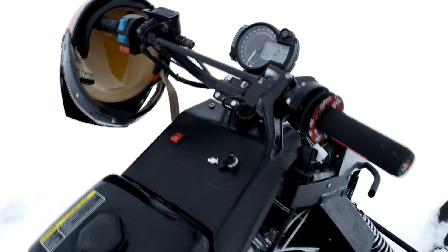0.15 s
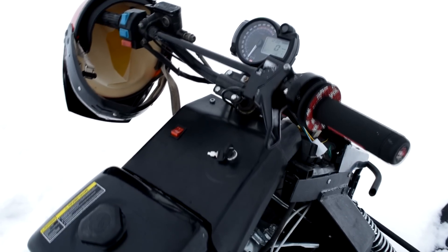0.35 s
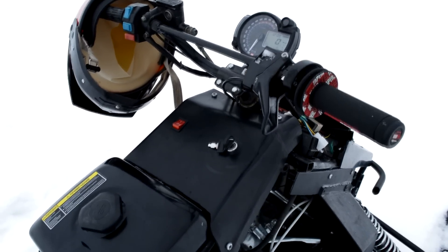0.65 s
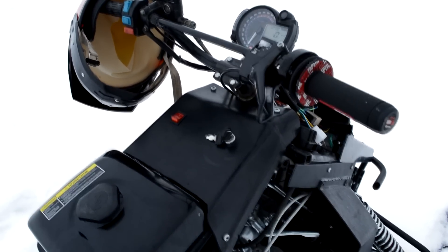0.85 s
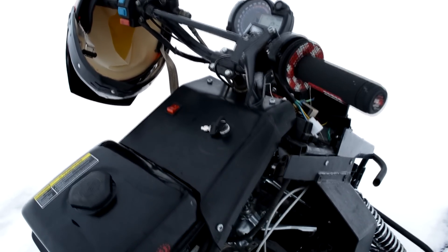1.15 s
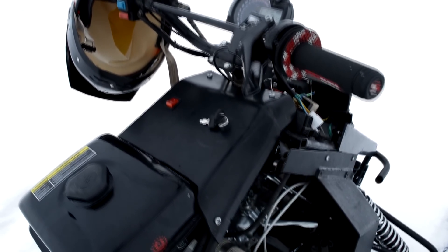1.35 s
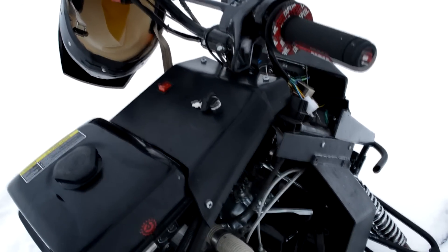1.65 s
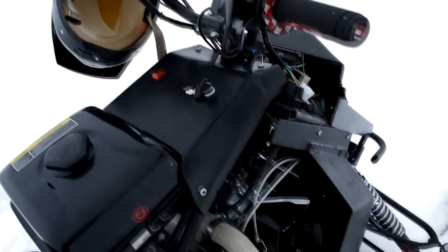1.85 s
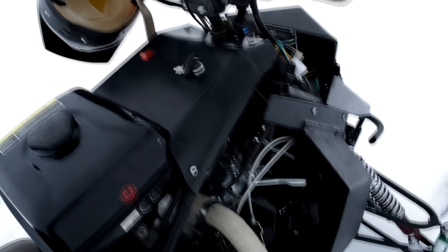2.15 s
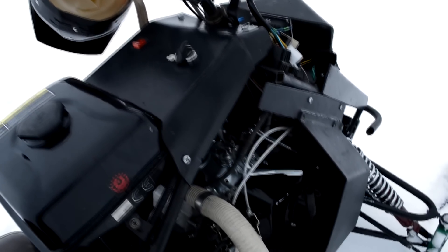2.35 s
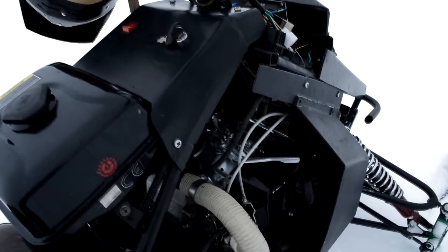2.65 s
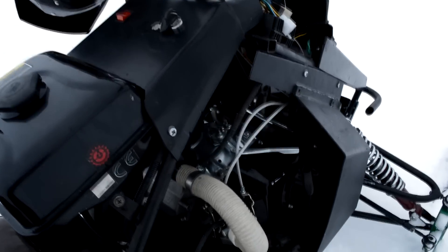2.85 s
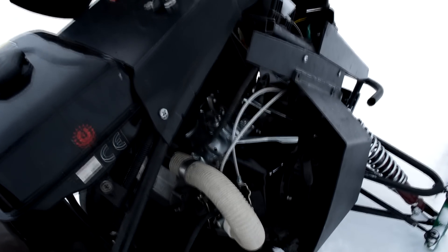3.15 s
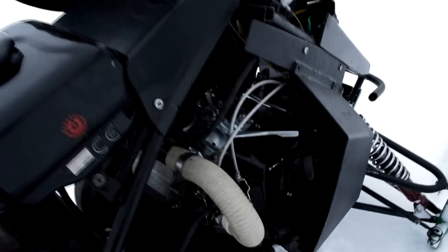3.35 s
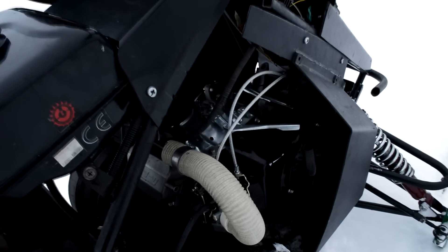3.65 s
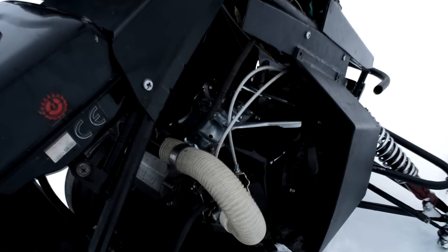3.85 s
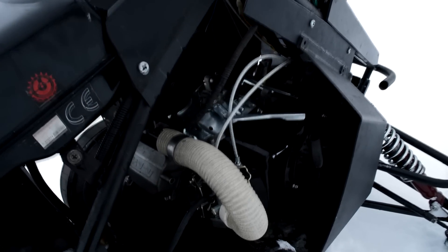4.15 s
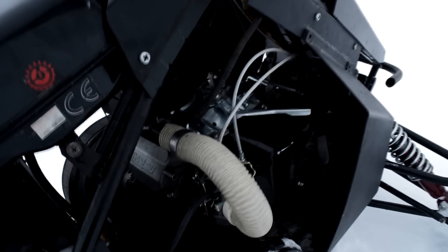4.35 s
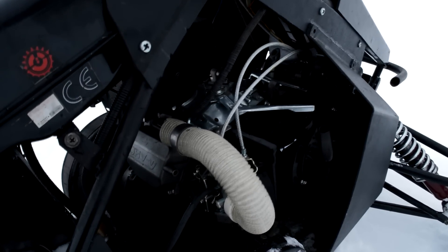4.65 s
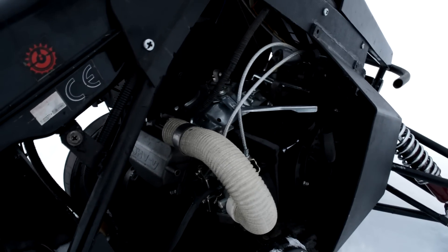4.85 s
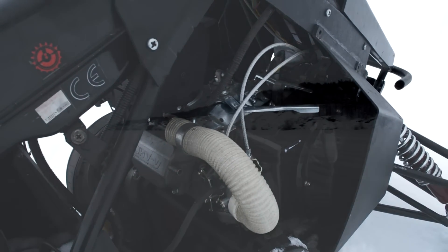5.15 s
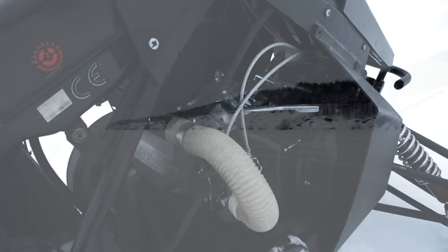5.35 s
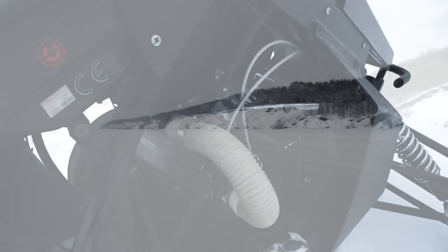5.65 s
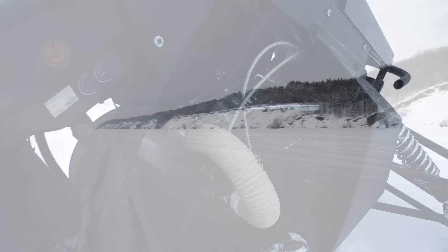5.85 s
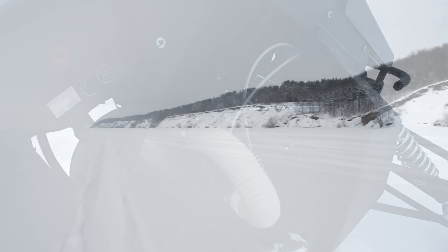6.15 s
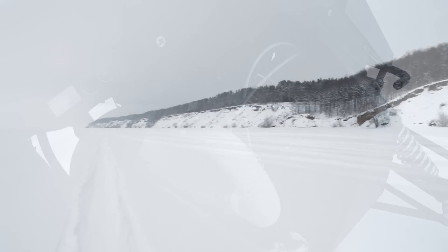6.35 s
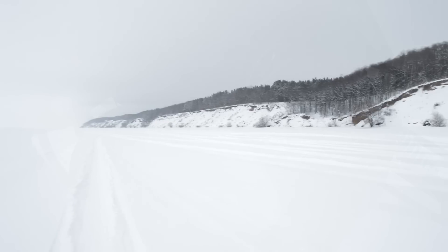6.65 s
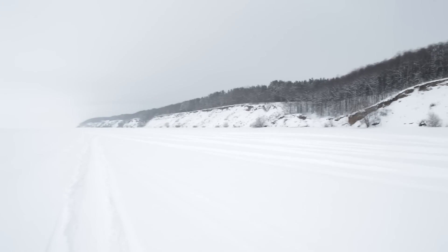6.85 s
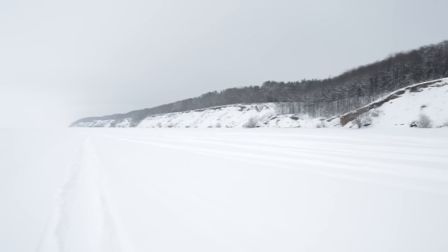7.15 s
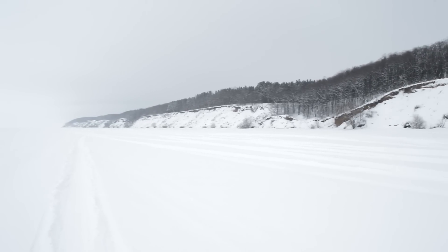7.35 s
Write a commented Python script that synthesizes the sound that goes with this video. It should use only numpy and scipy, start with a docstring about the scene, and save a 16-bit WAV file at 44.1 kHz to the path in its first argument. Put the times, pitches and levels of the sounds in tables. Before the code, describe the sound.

A parked snowmobile's one-cylinder four-stroke engine idles outdoors with a fast, even beat. Bright metallic knocks and rattles ring over a whirr, a light hiss and weak, low exhaust puffs. The tone shifts slightly as the close microphone moves from the tank toward the cylinder. After about five seconds the engine fades out, leaving very faint air, a low microphone flutter and a barely audible high whistle.

```python
"""Outdoors, a one-cylinder four-stroke engine idles in an open frame while the microphone moves closer.
In every cycle, puffs of exhaust gas boom in the silencer, and metal parts knock together in a fixed
order and make the casing ring. Then the engine is faded out, leaving still air on a snow field,
a low flutter on the microphone and a thin electronic whistle."""
import sys
import numpy as np
from scipy import signal
from scipy.fft import rfft, irfft, next_fast_len
from scipy.io import wavfile
from scipy.ndimage import map_coordinates

SR = 44100
rng = np.random.default_rng(int(sys.argv[2]) if len(sys.argv) > 2 else 0)


def file_out(sig):
    """Save sig as 16-bit WAV at sys.argv[1]."""
    # one column per channel
    cols = np.atleast_2d(sig).T
    # limit, then scale
    lim = np.clip(cols, -1, 1)
    pcm = np.round(lim * 32767).astype(np.int16)
    wavfile.write(sys.argv[1], SR, pcm)


N = 330750
T = np.arange(N) / SR


def amp(db):
    return 10 ** (np.asarray(db) / 20)


def unit(x):
    return x / np.sqrt(np.mean(x ** 2) + 1e-20)


def over_time(rows):
    """Join (time, value) points with straight lines."""
    return np.interp(T, *np.transpose(rows))


def over_pitch(hz_points, db, f):
    """Join (frequency, level) points into a gain for each frequency f."""
    return amp(np.interp(np.log(f + 1), np.log(hz_points), db))


def wobble(rate):
    """A smooth curve through `rate` random values a second."""
    return map_coordinates(rng.standard_normal(int(N * rate / SR) + 4), [T * rate])


def filtered(x, response):
    """Scale and delay each frequency of x as response(f) says."""
    size = next_fast_len(N + SR // 2) * 2
    return irfft(rfft(x, size) * response(np.fft.rfftfreq(size, 1 / SR)), size)[..., :N]


def ring_after(gain):
    """A filter with these gains that rings only after a blow, never before."""
    cepstrum = irfft(np.log(gain + 1e-6))
    half = len(cepstrum) // 2
    cepstrum[1:half] *= 2
    cepstrum[half + 1:] = 0
    return np.exp(rfft(cepstrum))


def resonance(f, hz, width):
    """One ringing note: the narrower it is, the longer it rings."""
    return 1j * f * width / (hz * hz - f * f + 1j * f * width)


# The tone of the air noise: f/Hz, level/dB
AIR_TONE = [(20, -33), (40, 1), (65, -3), (150, -10), (500, -19), (1700, -24.5), (8000, -31), (15500, -36)]

def still_air(flutter_db=3.58):
    """Faint air noise whose bass flutters on the microphone."""
    hz, db = np.transpose(AIR_TONE)
    air = unit(filtered(rng.standard_normal(N), lambda f: over_pitch(hz, db, f)))
    bass = filtered(air, lambda f: 1 / (1 + (f / 200) ** 4))
    return air + bass * (amp(flutter_db * wobble(16)) - 1)


def whistle(fade, hz=15687, start_db=-71, end_db=-61):
    """The thin, wavering whistle of the electronics swells late in the fade."""
    tone = np.sqrt(2) * np.sin(2 * np.pi * hz * T + .6 * wobble(25))
    return (amp(start_db) + (amp(end_db) - amp(start_db)) * fade ** 2.5) * tone


# How fast the engine idles: t/s, speed/(cycles per s)
IDLE_SPEED = [(0, 12.064), (.9, 11.737), (1.25, 11.907), (1.9, 11.858), (3, 12.017), (4.4, 12.399),
              (5.1, 12.298), (5.65, 12.291), (5.9, 12.045), (7.5, 11.806)]

def once_per_cycle(position, jitter, scatter_db):
    """One click at this position in every engine cycle, a little off in time and size."""
    cycles = .039 + np.cumsum(over_time(IDLE_SPEED)) / SR  # starts just into a cycle
    count = int(cycles[-1])
    slip, size = rng.standard_normal((count, 2)).T
    when = np.interp(np.arange(count) + position + jitter * slip, cycles, T)
    samples = np.minimum((when * SR).astype(int), N - 1)
    return np.bincount(samples, amp(scatter_db * size), N)


# Puffs of gas: position/cycle, relative pressure (below 0 sucks)
GAS_PUFFS = [(.205, .45), (.263, -.43), (.316, 1), (.414, -.66), (.57, .43), (.72, .25), (.87, .3)]
# The silencer's notes: f/Hz, width/Hz, level/dB, sign (-1 flips the wave)
SILENCER_NOTES = [(51, 21, 0, 1), (135, 24, -2, 1), (99, 8, -8, -1), (205, 24, -6, 1), (280, 22, -8.5, -1),
                  (362, 14, -12, 1)]

def exhaust(swirl_db=-16, cutoff_hz=45):
    """Puffs and swirling gas boom in the silencer; little of the deepest bass gets out."""
    puffs = sum(size * once_per_cycle(at, jitter=.0018, scatter_db=.8) for at, size in GAS_PUFFS)
    gas = unit(puffs) + amp(swirl_db) * rng.standard_normal(N)

    def silencer(f):
        notes = sum(sign * amp(db) * resonance(f, hz, width) for hz, width, db, sign in SILENCER_NOTES)
        ratio = f / cutoff_hz
        bass_cut = -ratio ** 2 / (1 + 1.4j * ratio - ratio ** 2)
        return bass_cut * notes
    return unit(filtered(gas, silencer))


# Round trips of a blow inside the frame: t/ms
ROUND_TRIPS = [.7, 1.1, 1.7, 2.3, 3.7]

def through_frame(f):
    """Echoes smear a blow in time, and low notes travel more slowly through the metal."""
    trips = np.exp(-2j * np.pi * f * np.array(ROUND_TRIPS)[:, None] / 1000)
    echoes = np.prod((trips - .6) / (1 - .6 * trips), axis=0)
    lag = np.exp(-2j * np.pi * .0045 * (2 * np.sqrt(1000 * f) - f / np.sqrt(3)))  # no delay at 3 kHz
    head_start = np.exp(2j * np.pi * f * .0065)  # centres the smear on the knock
    return lag * echoes * head_start


# The four parts are tank, panels, casing and fins, from low to high. Borders between them: f/Hz
PART_BORDERS = [1000, 1700, 3300]
# Metal hitting metal: position/cycle, rattle rise/ms, rattle decay/ms, level/dB for each part
METAL_KNOCKS = [(.215, 1, 3.5, -3, -8, -4, 4), (.265, 1, 3.5, 0, -2, -1, 4), (.5, 1.5, 4, -1, -4, 4.5, 1),
                (.595, .8, 3, 4, 6, 6, 8), (.635, .8, 3.5, 2, 4, 7, 5.5), (.775, 1, 4.5, 6.5, 3, 2, 0),
                (.9, 1.5, 5, 0, -2, 1, -6)]
# How much of a knock's energy is one solid blow: share (0-1) for each part
SOLID_SHARE = np.array([[.95], [.92], [.7], [.2]])
# Steady whirr of chain and bearings: level/dB for each part
WHIRR = [-6, -6.5, -6, -8]

def knocks(flicker_db=1.3):
    """Each knock shakes the parts with a solid blow and a short rattle, over a steady whirr."""
    ms = np.arange(SR // 20) / SR * 1000
    noise_power = amp(WHIRR)[:, None] ** 2 * np.ones(N)
    blows = 0
    for position, rise, decay, *db in METAL_KNOCKS:
        hits = once_per_cycle(position, jitter=.0005, scatter_db=.6)
        gain = amp(db)[:, None]
        shape = np.exp(-ms / decay) * (1 - np.exp(-ms / rise))
        bursts = np.abs(signal.fftconvolve(hits ** 2, shape)[:N])
        noise_power += (1 - SOLID_SHARE) * gain ** 2 * bursts
        blows = blows + np.sqrt(SOLID_SHARE * shape.sum()) * gain * hits
    rattle = np.sqrt(noise_power) * rng.standard_normal(N) * amp(flicker_db * wobble(600))

    def part_ranges(f):
        below_border = [1 / (1 + (f / hz) ** 8) for hz in PART_BORDERS]
        return np.diff(below_border, axis=0, prepend=0, append=1)
    return filtered(rattle + filtered(blows, through_frame), part_ranges).sum(axis=0)


def hiss():
    """A steady high hiss, perhaps cooling air."""
    return filtered(rng.standard_normal(N), lambda f: amp(-.71) * resonance(f, hz=8670, width=3600) ** 2)


# The notes the metal rings with: f/Hz, width/Hz
METAL_NOTES = [(584, 20), (653, 26), (765, 56), (865, 26), (981, 22), (1100, 56), (1216, 24), (1310, 56),
               (1440, 84), (1626, 56), (2040, 126), (2130, 70), (2280, 98), (2390, 98), (2520, 84),
               (2710, 112), (2870, 98), (2960, 126), (3180, 168), (3490, 50), (3890, 126), (5100, 280),
               (5750, 150), (6700, 210), (9600, 490)]
# How strong each note is: level/dB at microphone spots 0, 1, 2
NOTE_LEVELS = [(8.5, 10.5, 9), (-2, 11.5, 14), (6, 13.5, 14), (0.5, 9, 1), (15, 9.5, 10), (11, -12, 5),
               (-6, 21, 16), (5, -3, -14), (8, 11, 9), (8, 8.5, 6.5), (6, 6.5, 8), (13.5, 3, 9),
               (14.5, 12.5, 13), (10.5, 8.5, 10), (13, 7, 8.5), (15.5, 5.5, 5.5), (6.5, 10, 4),
               (13.5, 9, 6.5), (6.5, 1, 5.5), (12.5, 6, -1.5), (10.5, 1, 1.5), (-1, -4, -3), (1.5, 4, 3),
               (-1.5, 1.5, -5), (-9, -13.5, -8)]
# The sound between the notes: f/Hz, level/dB at spots 0, 1, 2
BETWEEN_NOTES = [(282, 4.5, 0.5, -1.5), (462, -9.5, -7.5, -7), (573, -1, 4.5, -1.5), (910, 8, 5, 1),
                 (1410, 5, 7, 3), (1800, 5, 3, 1.5), (2400, -1, 4.5, -4), (3280, 8.5, 0, -2),
                 (4580, -1.5, -5, -3), (6300, -4.5, -2, -5.5), (7300, -7, -5.5, -9.5),
                 (8140, -17.5, -6, -7), (8750, -11, -14, -13.5), (10420, -11, -11.5, -10.5),
                 (11530, -25, -15.5, -16), (13000, -28, -23, -21), (14500, -32.5, -22.5, -23.5),
                 (15300, -39, -29, -29)]

def ringing_metal(mic_spot):
    """The shaking makes the metal ring; each microphone spot hears its own mix of the notes."""
    shaking = knocks() + hiss()
    hz, *between_db = np.transpose(BETWEEN_NOTES)
    sound = 0
    for spot in range(3):
        def body(f):
            note_power = sum(np.abs(amp(db[spot]) * resonance(f, *note) ** 2) ** 2
                             for note, db in zip(METAL_NOTES, NOTE_LEVELS))
            between_power = over_pitch(hz, between_db[spot], f) ** 2
            bass_cut = f ** 4 / (f ** 4 + 240 ** 4)
            return ring_after(np.sqrt(note_power + between_power) * bass_cut)
        nearness = np.clip(1 - np.abs(mic_spot - spot), 0, 1)
        sound = sound + nearness * unit(filtered(shaking, body))
    return sound


# The microphone's path: t/s, spot (0 above the tank, 1 beside it, 2 near the cylinder)
MIC_PATH = [(0, .1), (1.4, 0.34), (2.3, 0.85), (3.1, 0.93), (4.1, 1.8), (7.5, 2)]

def scene(fade_from_s=5.31, fade_to_s=6.931):
    """The engine idles, then is faded out; the air and the whistle stay."""
    mic_spot = over_time(MIC_PATH)
    fade = np.clip((T - fade_from_s) / (fade_to_s - fade_from_s), 0, 1)
    engine = amp(-26.5) * ringing_metal(mic_spot)
    engine += amp(-43 - mic_spot) * exhaust()  # 1 dB quieter with each spot
    background = amp(-61) * still_air() + whistle(fade)
    return (background + (1 - fade ** 1.5) * engine)[None]


def record(dry, top_hz=15760):
    """Cut away the very highest treble."""
    return filtered(dry, lambda f: f < top_hz)


dry = scene()
out = record(dry)
file_out(out)
```